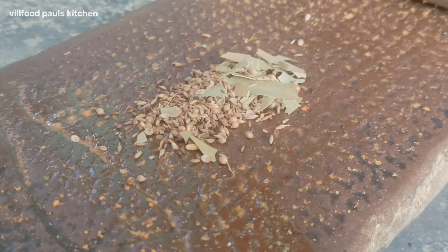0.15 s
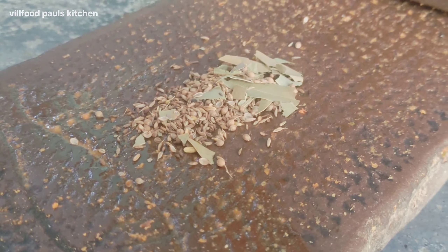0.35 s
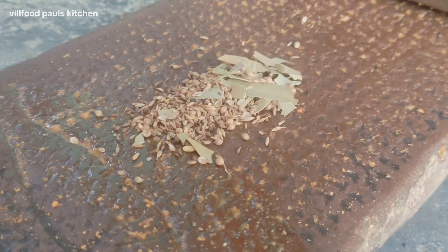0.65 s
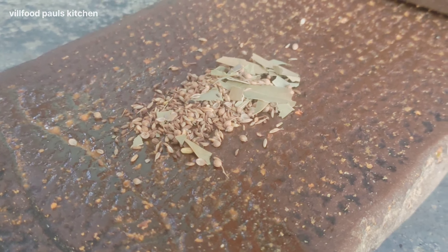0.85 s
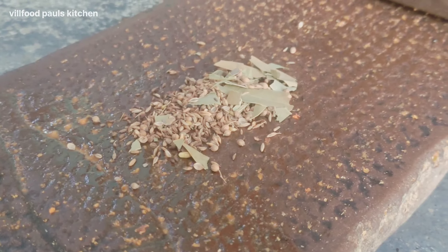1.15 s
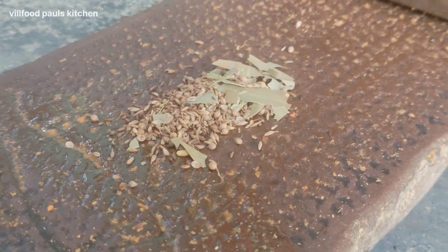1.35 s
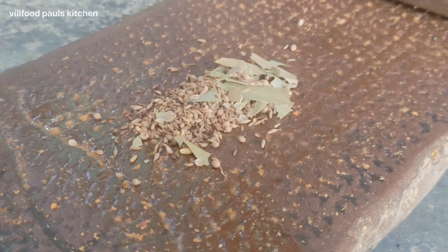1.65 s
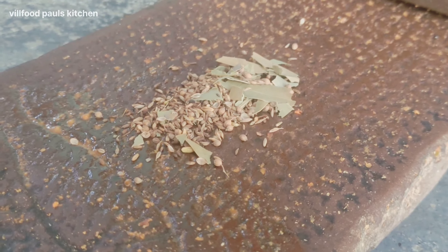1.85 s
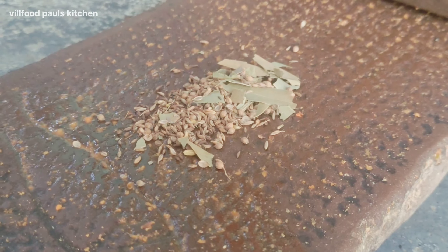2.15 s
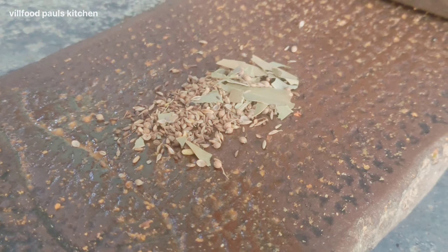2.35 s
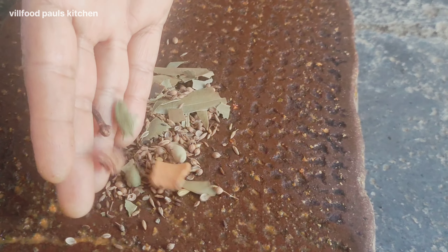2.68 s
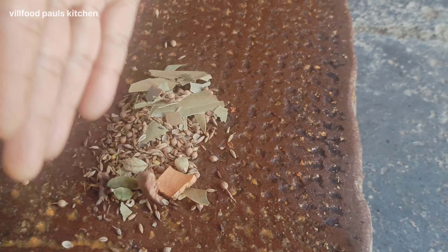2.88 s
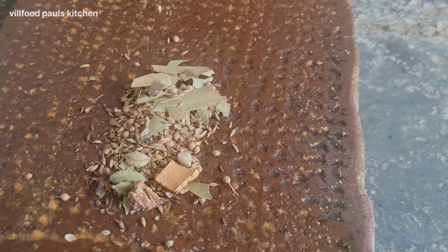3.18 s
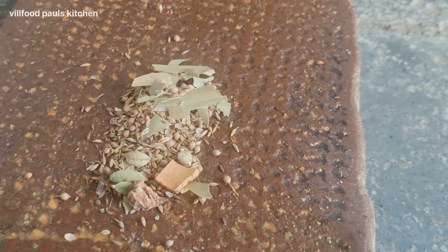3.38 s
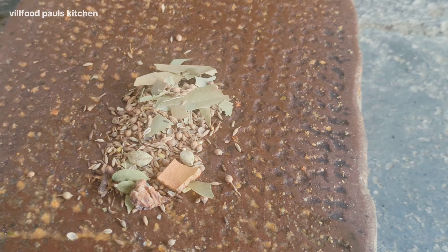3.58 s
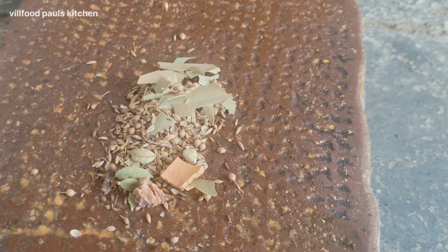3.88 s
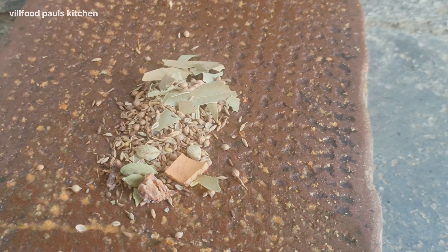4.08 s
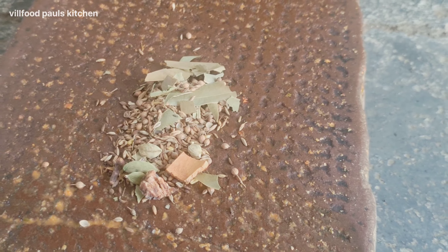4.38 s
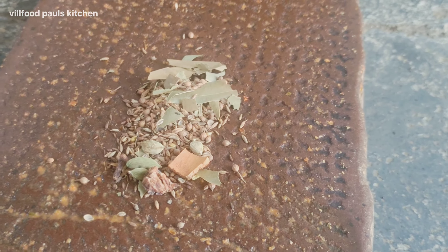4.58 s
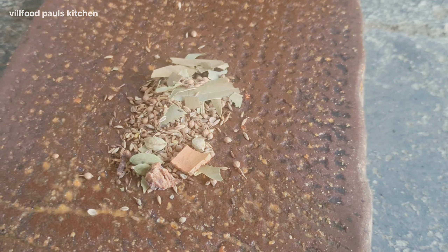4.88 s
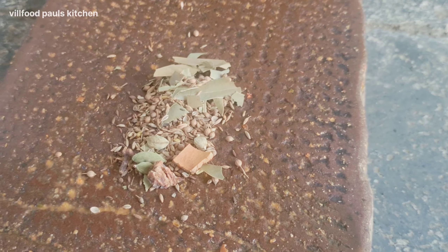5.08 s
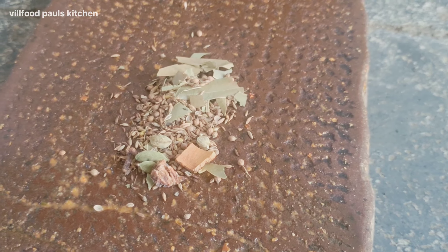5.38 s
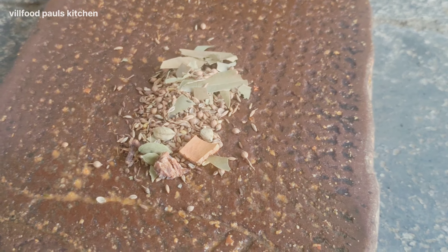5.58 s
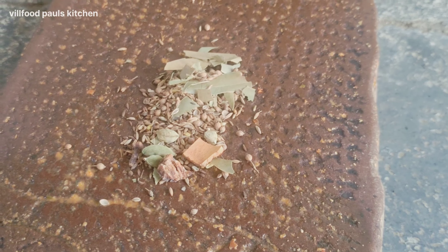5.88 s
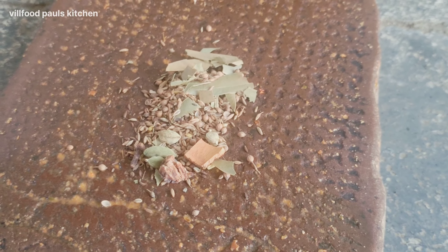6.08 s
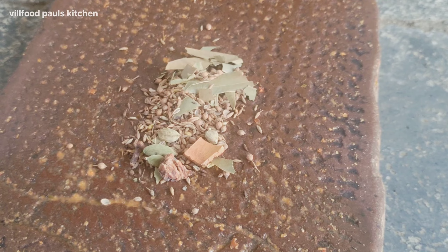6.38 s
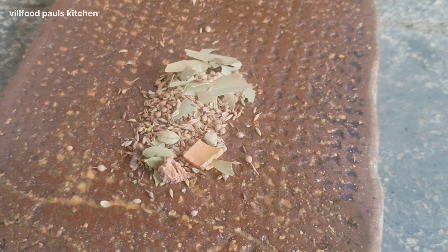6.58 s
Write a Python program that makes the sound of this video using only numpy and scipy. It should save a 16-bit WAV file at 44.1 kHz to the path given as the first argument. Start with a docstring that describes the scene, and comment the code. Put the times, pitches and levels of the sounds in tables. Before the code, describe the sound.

In an open-air kitchen, gravy simmers with small blips, deep gulps and sharp wet pops, and steam hisses in a cluster before a momentary silence. Several crisp clicks of whole spices on stone follow, with thin bird whistles and a hoarse call behind. The pot then starts up again, sputtering and popping loudly. Short dry yard echoes, faint outdoor rumble and airy hiss; close stereo sound with little deep bass.

```python
"""Thick curry simmers in a pot in an open-air kitchen: ringing air pockets gulp, skins burst and steam vents.
The sound drops out briefly, just after a low bump of air on the microphone, made as one more damped tone;
then a few whole spices click down on a stone slab as short bursts of noise.
Small birds are heard in the distance: gliding tones whistle and an unsteady tone with an octave rasps.
Outdoors lie a low rumble and a hiss of shaped noise. The microphone rolls off the deepest bass."""
import sys
import numpy as np
from scipy import signal
from scipy.fft import rfft, irfft, next_fast_len
from scipy.io import wavfile
from scipy.ndimage import uniform_filter1d, map_coordinates

SR = 44100
rng = np.random.default_rng(int(sys.argv[2]) if len(sys.argv) > 2 else 0)


def transcribe(signal):
    """Save signal, clipped to [-1, 1], as a 16-bit WAV file at the path in sys.argv[1]."""
    frames = np.atleast_2d(signal).T
    limited = np.clip(frames, -1, 1)
    pcm = np.round(limited * 32767).astype(np.int16)
    wavfile.write(sys.argv[1], SR, pcm)


N = 297234

# Open air, in stretches of rows: t/s, rumble/dB, simmer/dB, hiss/dB (each before its layer's lift)
BACKGROUND_LEVELS = [
    [(0.0, -51, -55.5, -68), (0.63, -52, -56.5, -65.5), (0.916, -51, -54, -67.5),
     (1.184, -52.5, -57.5, -70), (1.378, -51, -60, -64), (1.526, -58, -60.5, -65),
     (1.678, -58, -58.5, -62.5), (1.95, -53.5, -55, -68)],
    [(3.15, -54.5, -62, -61.5), (3.41, -53, -57.5, -63.5), (4.18, -51, -56.5, -60), (4.46, -50, -48.5, -61),
     (4.79, -52.5, -59, -64.5), (5.24, -50.5, -54, -61.5), (6.32, -57.5, -60, -67.5),
     (6.7, -49.5, -59.5, -61)],
]
# Noise colours: f/Hz, relative level/dB per Hz
RUMBLE_COLOUR = [(25, -12.5), (45, -2.5), (70, -0.5), (150, 0.5), (220, -8.5), (320, -10), (600, -28),
                 (1200, -38.5)]
HISS_COLOUR = [(600, -22), (1200, -18.5), (2000, -12.5), (2900, -2), (3900, -10), (6000, -11), (7600, -16),
               (8400, -21), (15000, -21.5)]
SIMMER_COLOUR = [(200, -20), (450, -5), (800, -0.5), (1400, -13), (2500, -10.5), (6000, -64)]
SPLAT_COLOUR = [(60, -26), (250, -5), (400, -8), (780, -1.5), (1000, 4.5), (1300, 0.5), (1900, -2.5),
                (2800, 0.5), (4000, -3.5), (7400, -6.5), (8400, -13), (12000, -13.5), (15000, -16.5)]
# Echo decay of the yard and of the trees: f/Hz, t60/s
YARD_DECAY = [(100, 0.11), (800, 0.22), (3000, 0.11), (14000, 0.07)]
TREE_DECAY = [(1000, 0.28), (8000, 0.9)]
# Whistled bird notes: t/s, length/s, f/Hz, glide/octaves, level/dB before the dry and echo shares
WHISTLE_NOTES = [(.173, .16, 3450, 0.16, -51.5), (0.616, 0.21, 3684, .09, -49.5),
                 (0.618, 0.14, 5900, 0.048, -53.5), (0.926, 0.089, 3740, 0.0094, -50),
                 (1.493, 0.07, 4920, .13, -51), (1.548, 0.14, 5800, -0.12, -49),
                 (1.844, 0.078, 4040, -0.032, -54.5), (2.86, 0.15, 4680, 0, -48.5),
                 (3.098, .19, 4530, 0.2, -46.5), (3.642, 0.077, 4190, -0.0062, -43.5),
                 (3.712, 0.037, 3450, -.27, -45), (6.272, .19, 2290, -0.012, -45)]
# Calls of a hoarse bird: t/s, hold/s, level/dB
RASP_CALLS = [(2.63, 0.12, -47), (2.938, 0.044, -37.5), (3.94, 0.067, -59), (4.71, 0.082, -57.5),
              (5.43, 0.0099, -41), (5.925, .03, -41.5), (6.645, 0.012, -51)]
# Dry spices landing: t/s, level/dB, f/Hz, left over right/dB
SPICE_TICKS = [(2.825, -60.5, 3420, 25.5), (2.902, -47.5, 5000, -2), (2.915, -46.5, 6100, -3),
               (2.963, -34, 7800, 4), (3.7745, -34, 7800, -1.5)]
# Resonances of the pot: f/Hz, width/Hz, lift/dB
POT_RESONANCES = [(546, 95, 9.5), (759, 37, 10), (1247, 64, 4.5), (1692, 160, 6), (2230, 130, 2.5),
                  (2608, 53, 3), (2743, 37, 8.5), (3160, 75, 3.5), (3524, 65, 6), (5370, 590, -0.5)]
# Larger jets of steam: t/s, level/dB, t60/s, lows/dB, highs/dB
STEAM_JETS = [(.08, -41, 0.28, -4, -13), (0.376, -49, 0.16, -1, 3), (0.494, -40, 0.15, 17.5, -32),
              (.79, -49, 0.45, -1, 11), (1.402, -40.5, 0.18, -27, 14), (1.899, -41, .065, -10, 40),
              (1.974, -33.5, 0.26, 5, 13.5), (2.025, -33, 0.21, 15, 6), (2.217, -29, 0.34, -6, 25.5),
              (2.248, -31, 0.25, -10, 18.5), (2.33, -37, 0.34, 8, 0), (2.38, -33.5, 0.15, 4, -1),
              (3.7, -45.5, 0.57, -3.5, -4), (3.919, -43.5, 0.22, -1, -20), (4.275, -40, 0.41, 5.5, -38),
              (4.914, -47.5, 0.25, -24, 3), (5.001, -45, 0.096, -18, -7), (5.1, -43.5, 0.36, -3, -2),
              (5.155, -36, .42, -12, -4), (5.338, -41, 0.3, 20, -18.5), (5.407, -21.5, 0.21, 3, -1),
              (5.568, -46, 0.099, -1, -32), (5.87, -45, 0.52, -3, -11)]
# Bursting skins: t/s, level/dB, lows/dB, highs/dB, spray/dB, left over right/dB
SKIN_BURSTS = [(.431, -42, 2, -10, -4, -4), (.851, -41.5, 7.5, 7, -8.5, 7.5),
               (1.09, -27, 5.5, 8.5, -8.5, -2.5), (1.3144, -15, 6.5, 4, -10.5, 6.5),
               (1.7051, -39, -42, 23, -15, 6), (1.9308, -31.5, 14.5, 7, -5, 9),
               (4.093, -28.5, -10.5, -32, -8.5, -2.5), (4.582, -45, -6, 1, 6.5, -9),
               (4.6219, -23, -4, 5.5, -6, -7.5), (5.43, -17, -44, -8, -1.5, -0.5),
               (5.979, -18, 1, -9, -1.5, 1), (6.0605, -19, 3, -1.5, -3, -5), (6.595, -43, 13.5, -18, 1, 12)]
# Air pockets ringing in the gravy, and at 2.456 s a low bump of air on the microphone:
# t/s, level/dB, starting f/Hz, rise/s
POCKETS_AND_BUMP = [(.11, -39.5, 278, 0.013), (.942, -37.5, 580, 0.0012), (1.006, -31, 567, 0.014),
                    (1.068, -33, 508, 0.0035), (1.094, -18, 157, 0.0023), (1.095, -35, 2500, 0.022),
                    (1.128, -29, 151, 0.0048), (1.275, -39, 1045, 0.0015), (1.312, -14.5, 138, 0.00091),
                    (1.3145, -19, 560, 0.00084), (1.3145, -14, 1260, .0005), (1.705, -24.5, 3900, 0.0012),
                    (1.8865, -16.5, 716, 0.0017), (1.898, -24, 804, 0.0071), (1.933, -21.5, 183, 0.0028),
                    (2.028, -30.5, 876, 0.0011), (2.376, -33.5, 799, 0.012), (2.456, -29.5, 61.5, 0.0016),
                    (4.094, -20.5, 1280, 0.00087), (4.203, -27.5, 1240, .002), (4.335, -35, 824, 0.021),
                    (4.38, -36, 761.5, 0.025), (4.593, -18, 580, 0.00087), (4.605, -18.5, 760, .006),
                    (5.351, -34, 817, 0.0067), (5.429, -24, 192, 0.0059), (5.43, -17, 277, 0.0017),
                    (5.98, -7, 770, 0.0023), (6.003, -18, 786, 0.024), (6.063, -18, 550, 0.0014),
                    (6.278, -23.5, 3430, 0.0023)]

DROPOUT_START_S, DROPOUT_END_S = 2.497, 2.654
DIP_DB, RECOVER_S = 14, 0.21  # the background swells back after the dropout
RUMBLE_LIFT_DB, SIMMER_LIFT_DB, HISS_LIFT_DB = 1.5, .5, 5.5  # over the background levels
TOP_HZ = 15600  # band limit
ARCH_OCTAVES = 0.0135  # each whistle bows upward in its middle
RASP_ATTACK_S, RASP_T60_S = 0.024, 0.51
TICK_T60_S = 0.016  # every pod stops ringing alike
POT_LAG_MS = (0.079, 0.411)  # delay at the left side, before and after the dropout begins
JET_RISE = 0.083  # rise as a share of t60
SMALL_JET_DB, SMALL_JET_RANGE_DB, SMALL_JET_T60_S = -50.5, 8.5, .2  # loudest level, spread below it, decay
SPRAY_T60_S = .24  # the spray after every burst dies alike
RING_CYCLES, LONGEST_RING_S = 42, 0.073  # t60 in cycles, and the limit set by the thick gravy
LINGER = 4.1  # a pocket that opens slowly adds this many rise times to its ring

TIME = np.arange(N) / SR
EVENT_TIME = np.arange(SR // 3) / SR  # every single event is cut off after a third of a second


def amp(db):
    """Decibels to gain."""
    return 10 ** (np.asarray(db) / 20)


def unit(x):
    """Scale to rms 1."""
    return x / np.sqrt(np.mean(x ** 2) + 1e-20)


def snap(x):
    """Scale a short stereo sound to the energy of rms 1 over 8 ms."""
    return x / np.sqrt(np.sum(x ** 2) / (2 * .008 * SR))


def along(points, hz):
    """Read a curve of (f/Hz, value) points on a log axis."""
    f, values = np.transpose(points)
    return np.interp(np.log(hz + 1), np.log(f + 1), values)


def filtered(x, response):
    """Multiply the spectrum of x by a response of frequency."""
    n = x.shape[-1]
    padded = next_fast_len(n + 4096)
    hz = np.fft.rfftfreq(padded, 1 / SR)
    return irfft(rfft(x, padded) * response(hz), padded)[..., :n]


def wobble(rate, size):
    """A smooth random curve with this many knots a second."""
    knots = rng.standard_normal(int(size * rate / SR) + 4)
    return map_coordinates(knots, [np.arange(size) * rate / SR])


def swell(rise, t60):
    """A rounded rise, then an exponential decay; top 1."""
    rise, t60 = max(rise, 1e-4), max(t60, 1e-3)
    opening = np.sin(np.pi / 2 * np.minimum(EVENT_TIME / rise, 1)) ** 2
    return opening * amp(-60 * np.maximum(EVENT_TIME - rise, 0) / t60)


def noise(colour_db, alike, size):
    """Coloured stereo noise of rms 1; long waves reach both sides alike."""
    turn = np.arccos(np.clip(alike, -1, 1)) / 2

    def mid_side_response(hz):
        mid_share = np.full_like(hz, np.cos(turn))
        side_share = np.sin(turn) * hz / np.hypot(hz, 250)
        return amp(colour_db(hz)) * np.array([mid_share, side_share])

    mid, side = filtered(rng.standard_normal((2, size)), mid_side_response)
    return unit(np.array([mid + side, mid - side]))


def placed(x, delay_ms, pan_db):
    """A positive delay makes the left side later; a positive pan makes it louder."""
    side = np.array([[.5], [-.5]])
    delayed = filtered(x, lambda hz: np.exp(-2j * np.pi * hz * side * delay_ms / 1000))
    return amp(side * pan_db) * delayed


def pot_lag(s):
    """The pot's delay at the left side at that time, in ms."""
    return POT_LAG_MS[int(s > DROPOUT_START_S)]


def add(track, s, sound):
    """Mix a sound into a track at a time."""
    start = max(round(s * SR), 0)
    part = track[:, start:start + sound.shape[-1]]
    part += sound[..., :part.shape[-1]]


def echoes(x, decay):
    """A fresh diffuse tail for each side, dying by frequency."""
    hz, t, z = signal.stft(rng.standard_normal((2, len(EVENT_TIME))), SR, nperseg=256)
    fading = amp(-60 * t / along(decay, hz)[:, None])
    tail = signal.istft(z * fading, SR, nperseg=256)[1]
    tail = tail / np.linalg.norm(tail[0])
    return signal.fftconvolve(np.atleast_2d(x), tail, axes=1)[:, :x.shape[-1]]


def spatter(x, depth_db):
    """Break a hiss into brief clumps of different pitch."""
    z = signal.stft(x, nperseg=256)[2]
    clumps = uniform_filter1d(rng.standard_normal(z.shape[1:]), size=4, axis=0)
    clumps = unit(uniform_filter1d(clumps, size=3, axis=1))
    flicker = rng.standard_normal(z.shape[-1]) / 2
    broken = signal.istft(z * amp(depth_db * (clumps + flicker)), nperseg=256)[1]
    return unit(broken[:, :x.shape[-1]])


def small_bubbles(hz, spread, cycles, size_db, count):
    """Scattered tiny bubbles, each a short damped tone; rms 1."""
    out = np.zeros((2, N))
    t = EVENT_TIME[:SR // 25]
    moments = rng.random((count, 2))
    characters = rng.standard_normal((count, 2))
    for (when, chance), (pitch, side) in zip(moments, characters):
        f = min(hz * np.exp(spread * pitch), TOP_HZ)
        size = amp(-size_db * np.log(max(chance, np.exp(-3))))  # a few are much louder
        tone = np.sin(2 * np.pi * f * t) * np.exp(-f * t / cycles)
        add(out, when * N / SR, size * amp([[side], [-side]]) * tone)
    return unit(out + amp(-4.5) * echoes(out, YARD_DECAY))


def background_levels():
    """Rumble, simmer and hiss in dB over time, dipping at the dropout and swelling back."""
    s, *columns = np.transpose(np.vstack(BACKGROUND_LEVELS))
    recovery = np.clip(1 - (TIME - DROPOUT_END_S) / RECOVER_S, 0, 1)
    dip_db = DIP_DB * (TIME > DROPOUT_START_S) * recovery
    return [np.interp(TIME, s, column) - dip_db for column in columns]


def outdoor_rumble(level_db):
    """Low noise of the open air, its level wandering slowly."""
    rumble = noise(lambda hz: along(RUMBLE_COLOUR, hz), 0.58, N)
    return amp(level_db + RUMBLE_LIFT_DB + 2.8 * wobble(12, N)) * rumble


def hiss_and_fizz(level_db):
    """Open-air hiss broken into fine clumps, with a fizz of tiny high bubbles."""
    hiss = spatter(noise(lambda hz: along(HISS_COLOUR, hz), 0.12, N), depth_db=2.0)
    hiss = amp(0.39 * wobble(26, N)) * hiss
    fizz = amp(-9.5) * small_bubbles(hz=5000, spread=0.9, cycles=1.5, size_db=22.5, count=400)
    return amp(level_db + HISS_LIFT_DB) * (hiss + fizz)


def whistlers():
    """Thin quavering notes, each a slightly arched glide, blurred by the trees."""
    out = np.zeros((2, N))
    for s, length, hz, glide, db in WHISTLE_NOTES:
        progress = np.minimum(EVENT_TIME / length, 1)
        bow = np.abs(np.sin(np.pi * progress))
        quaver = 1 + .011 * wobble(400, len(EVENT_TIME))
        pitch = hz * 2 ** (glide * (progress - .5) + ARCH_OCTAVES * bow) * quaver
        level = amp(db + 2.5 * wobble(110, len(EVENT_TIME))) * bow
        note = level * np.sin(2 * np.pi * np.cumsum(pitch) / SR)
        add(out, s, amp(-7) * placed(note, 0, pan_db=5) + amp(-6) * echoes(note, TREE_DECAY))
    return out


def rasper():
    """Hoarse calls rise, hold and fade: a fast unsteady tone and its weak octave, scattered by echoes."""
    phase = 2 * np.pi * np.cumsum(2810 * (1 + .065 * wobble(800, N))) / SR
    voice = amp(3 * wobble(110, N)) * (np.sin(phase) + amp(-25) * np.sin(2 * phase))
    direct = placed(voice, delay_ms=-0.46, pan_db=7.5)
    call = unit(direct + amp(16.0) * echoes(voice, TREE_DECAY))
    level = np.zeros(N)
    for s, hold, db in RASP_CALLS:
        attack = np.clip((TIME - s) / RASP_ATTACK_S, 0, 1)
        fading = np.maximum(TIME - s - RASP_ATTACK_S - hold, 0)
        level += attack * amp(db - 60 * fading / RASP_T60_S)
    return placed(call * level, 0, pan_db=6)


def spices():
    """Hard pods tick on stone, which hardly rings: noise peaked at each pod's pitch, with yard echoes."""
    out = np.zeros((2, N))
    for s, db, pitch, pan_db in SPICE_TICKS:
        husk = [(pitch / 8, -22), (pitch / 2, -15), (pitch, 0), (pitch * 1.3, -8), (pitch * 2, -10)]
        tick = noise(lambda hz: along(husk, hz), 0.081, len(EVENT_TIME))
        tick = snap(tick * swell(rise=0.0016, t60=TICK_T60_S))
        tick = amp(db) * placed(tick, 0, pan_db)
        add(out, s, tick + amp(-4.5) * echoes(tick, YARD_DECAY))
    return out


def pot_simmer(level_db):
    """Small bubbles between the bursts, over a wash of noise."""
    wash = amp(0.94 * wobble(16, N)) * noise(lambda hz: along(SIMMER_COLOUR, hz), 0.092, N)
    blips = amp(-2.5) * small_bubbles(hz=730, spread=.4, cycles=8.5, size_db=6, count=260)
    return amp(level_db + SIMMER_LIFT_DB) * (wash + blips)


def splat_noise(low_db, high_db, alike):
    """Noise in the pot's colour: wide openings add lows, narrow ones highs, each with its own resonances."""
    tilt = [(700, low_db), (1400, low_db / 4), (2800, 0.0072), (10000, high_db)]
    knots = np.arange(0, SR / 2, 130)
    vent_db = 2.2 * rng.standard_normal(len(knots)) * np.minimum(knots / 2000, 1)

    def colour_db(hz):
        pot_db = sum(db / (1 + (2 * (hz - centre) / width) ** 2) for centre, width, db in POT_RESONANCES)
        return along(SPLAT_COLOUR, hz) + along(tilt, hz) + pot_db + np.interp(hz, knots, vent_db)

    return noise(colour_db, alike, len(EVENT_TIME))


def small_jets(count):
    """Rows like STEAM_JETS, one small jet at a random moment in each equal stretch of time."""
    rows = []
    for k, (when, size) in enumerate(rng.random((count, 2))):
        s = (k + when) / count * N / SR
        rows.append((s, SMALL_JET_DB - SMALL_JET_RANGE_DB * size, SMALL_JET_T60_S, 0, -3))
    return rows


def steam():
    """Steam splutters out through vents in the gravy; longer jets also build up more slowly."""
    out = np.zeros((2, N))
    for s, db, t60, low_db, high_db in STEAM_JETS + small_jets(count=9):
        jet = spatter(splat_noise(low_db, high_db, alike=.3), depth_db=4)
        jet = jet * swell(JET_RISE * t60, t60)
        add(out, s, amp(db) * placed(jet, delay_ms=0.36, pan_db=2.0))
    return out


def bursts():
    """The skin tears with a crack, just after steam leaks out; spray spreads from the tear."""
    out = np.zeros((2, N))
    for s, db, low_db, high_db, spray_db, pan_db in SKIN_BURSTS:
        lag = pot_lag(s)
        crack = snap(splat_noise(low_db, high_db, alike=.65) * swell(rise=.0014, t60=.024))
        spray = spatter(splat_noise(low_db + 0.5, high_db + 1.5, alike=0.14), depth_db=1.0)
        spray = spray * swell(rise=0.0092, t60=SPRAY_T60_S)
        leak = splat_noise(low_db, high_db, alike=0.17) * swell(rise=0.0036, t60=0.018)
        add(out, s - .006, amp(db - 12.5) * leak)
        add(out, s, amp(db) * (placed(crack, lag, pan_db) + amp(spray_db) * placed(spray, lag, 0)))
    return out


def gulps_and_bump():
    """Air pockets ring, creeping up in pitch, low and slow ones longest; the microphone bump is made alike."""
    out = np.zeros((2, N))
    for s, db, hz, rise in POCKETS_AND_BUMP:
        t60 = 1 / (hz / RING_CYCLES + 1 / LONGEST_RING_S) + LINGER * rise
        creep = 0.027 * np.minimum(EVENT_TIME / t60, 1)
        pitch = hz * (1 + creep + 0.013 * wobble(120, len(EVENT_TIME)))
        ring = amp(db) * swell(rise, t60) * np.sin(2 * np.pi * np.cumsum(pitch) / SR)
        yard = amp(-8.5) * min(hz / 700, 1) * echoes(ring, YARD_DECAY)  # low tones echo less
        add(out, s, placed(ring, pot_lag(s), pan_db=-1.0) + yard)
    return out


def scene():
    """The open air, the distant birds, the slab, and the pot with the bump on the microphone."""
    rumble_db, simmer_db, hiss_db = background_levels()
    open_air = outdoor_rumble(rumble_db) + hiss_and_fizz(hiss_db)
    birds = whistlers() + rasper()
    pot_and_bump = pot_simmer(simmer_db) + steam() + bursts() + gulps_and_bump()
    return open_air + birds + spices() + pot_and_bump


def record(dry):
    """The microphone's bass roll-off, a short dropout, rounded peaks and the band limit."""
    live = (TIME < DROPOUT_START_S) | (TIME > DROPOUT_END_S)
    bass_cut = signal.butter(2, 38, "high", fs=SR, output="sos")
    thin = signal.sosfilt(bass_cut, dry) * live
    rounded = thin / (1 + np.abs(thin / .8) ** 4) ** (1 / 4)
    return filtered(rounded, lambda hz: 1 / np.sqrt(1 + (hz / TOP_HZ) ** 160))


dry = scene()
out = record(dry)
transcribe(out)
```